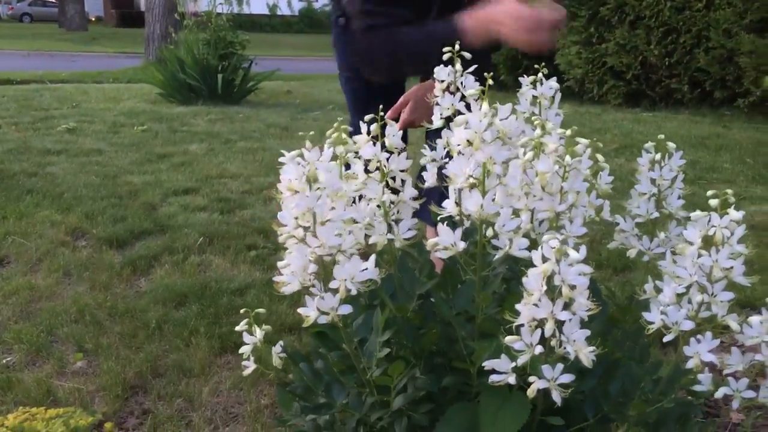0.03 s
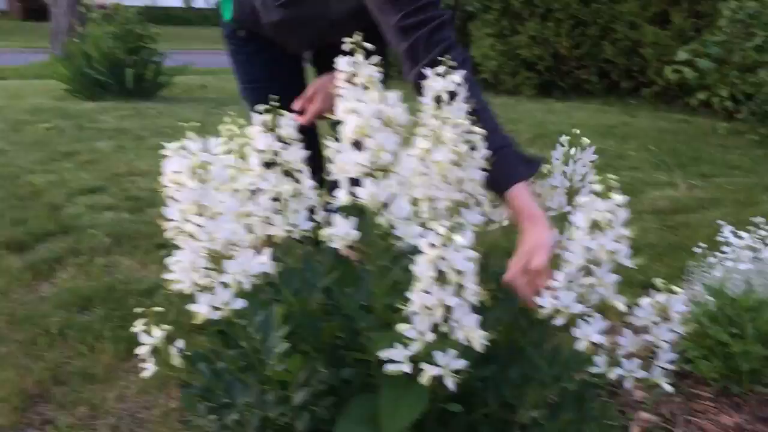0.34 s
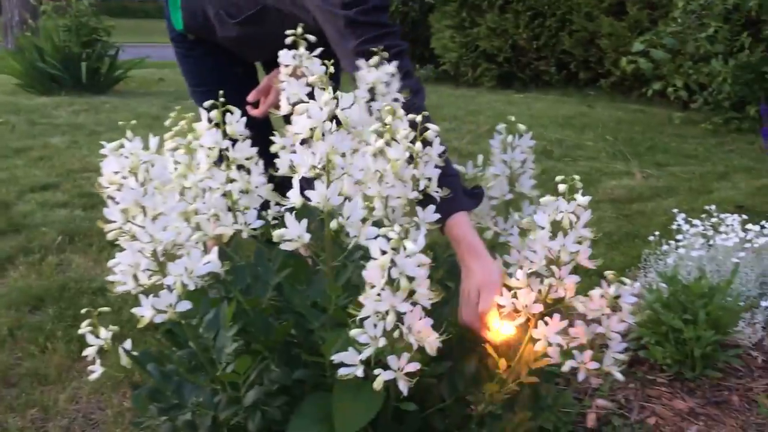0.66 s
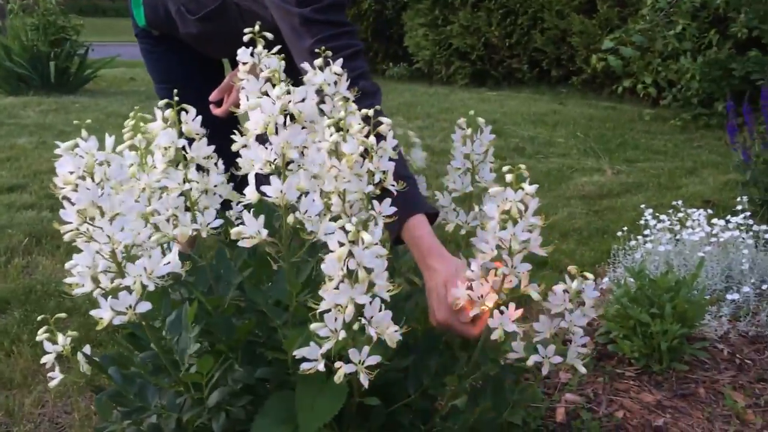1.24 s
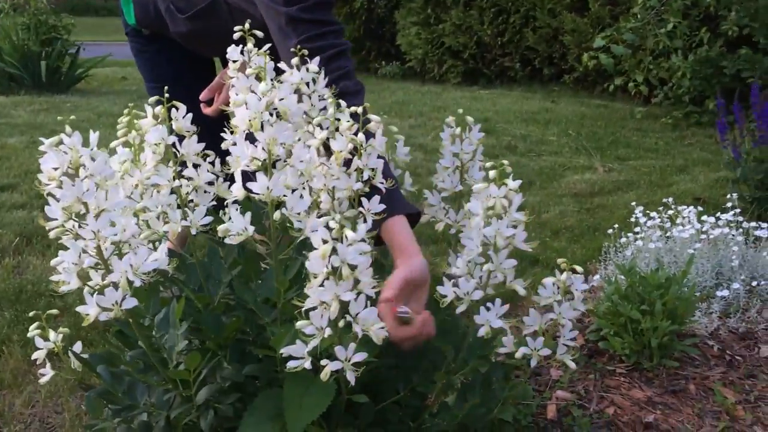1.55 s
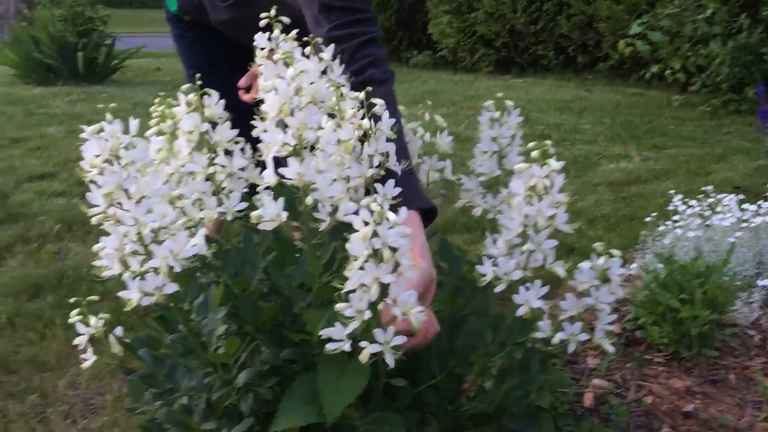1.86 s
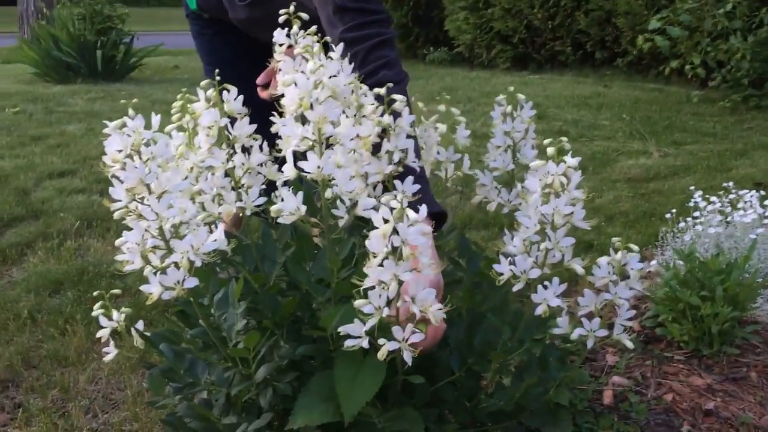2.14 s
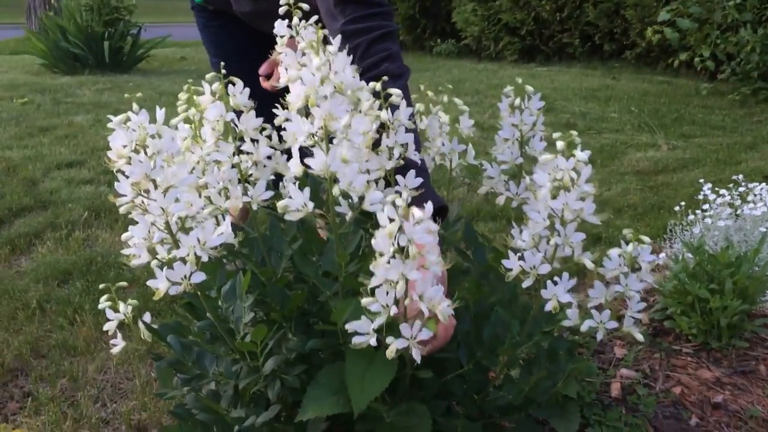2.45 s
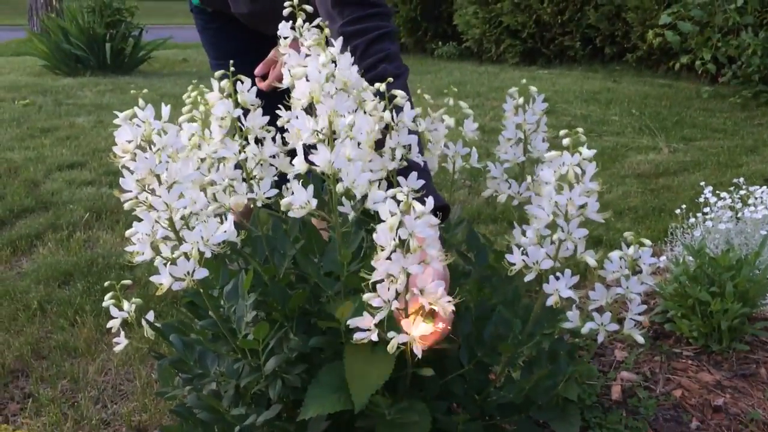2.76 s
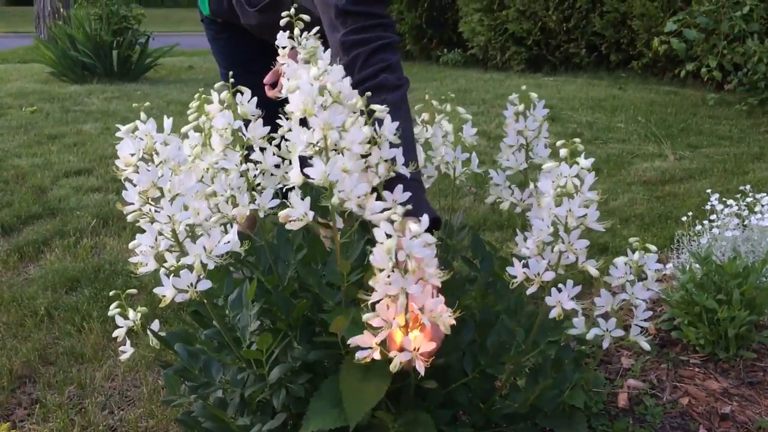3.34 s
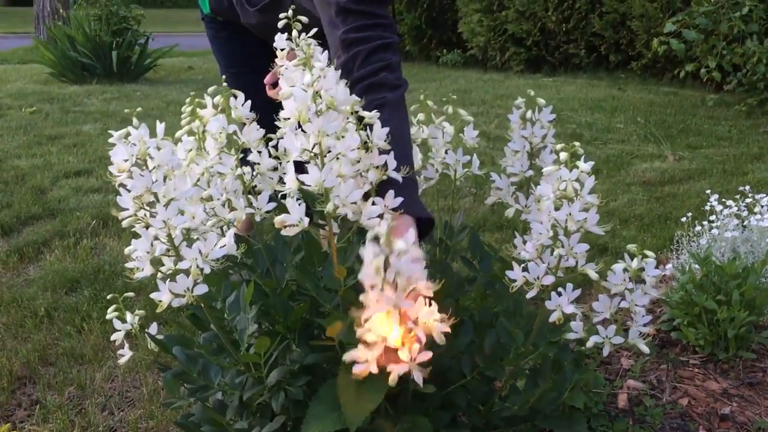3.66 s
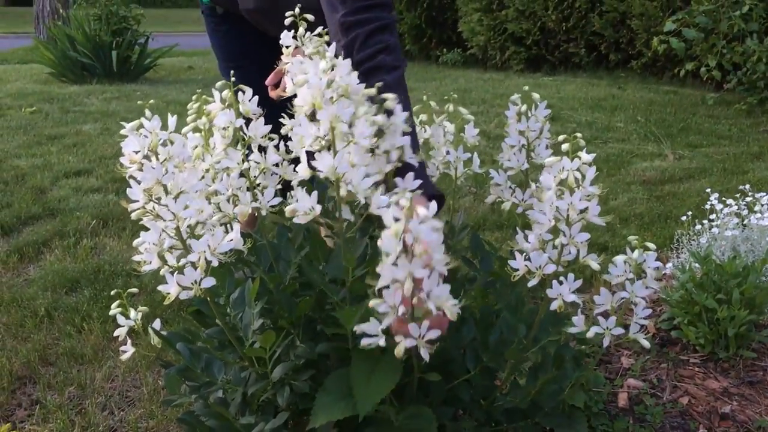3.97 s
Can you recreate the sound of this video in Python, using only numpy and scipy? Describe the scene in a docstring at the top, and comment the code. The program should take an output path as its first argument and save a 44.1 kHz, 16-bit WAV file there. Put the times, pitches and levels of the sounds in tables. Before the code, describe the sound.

A flint lighter rasps and snaps sharply close by at about 0.7, 2.2 and 2.8 seconds, the last strike the sharpest. Flame puffs softly from 0.9 to 1.3 seconds, and gas hisses faintly from 2.9 to 3.2. A bird trills quietly during the first second, while others whistle short phrases throughout. Leaves rustle slightly now and then over a low outdoor rumble and a distant engine drone.

```python
"""A lighter in a garden

A flint lighter is struck three times among the flowers: its wheel rasps and snaps, ringing the
hood and case. Gas hisses, the flame puffs and leaves brush a sleeve. One bird trills and others
whistle short phrases that echo in the trees, over a low rumble and the drone of a distant engine."""
import sys
import numpy as np
from scipy import signal
from scipy.fft import rfft, irfft
from scipy.io import wavfile

SR = 44100
rng = np.random.default_rng(int(sys.argv[2]) if len(sys.argv) > 2 else 0)


def generate_wav(signal):
    """Clip the signal to [-1, 1] and save it as 16-bit WAV at the path in sys.argv[1]."""
    frames = np.transpose(np.atleast_2d(signal))
    scaled = np.clip(frames, -1, 1) * 32767
    pcm = np.round(scaled).astype(np.int16)
    wavfile.write(sys.argv[1], SR, pcm)


N = 176400
T = np.arange(N) / SR

# tone of the distant rumble: (frequency [Hz], level [dB])
RUMBLE_SPECTRUM = [(45, -3.5), (70, 0), (85, 2.5), (105, -1), (122, -0.5), (140, -4.5), (165, -12),
                   (200, -14), (260, -18), (310, -25), (360, -31), (500, -48.5)]
# loudness of the rumble: (time [s], level [dB])
RUMBLE_LEVEL = [(0, -37), (.6, -41), (1.3, -42), (2.5, -42), (4, -44)]
# tone of the neighbourhood's hush: (frequency [Hz], level [dB])
HUSH_SPECTRUM = [(300, 6), (500, 2), (1000, 4), (1400, 1), (2200, -3.5), (3200, -12.5), (4800, -18.5),
                 (7000, -17.5), (10500, -23), (12500, -23), (15500, -26)]
# how fast the engine runs: (time [s], cycle rate [Hz])
ENGINE_RATE = [(0, 24.84), (1.4, 24.86), (1.9, 25.32), (2.5, 24.87), (3, 25.22), (4, 24.94)]
# the engine's two strongest tones, one list each: (time [s], level [dB])
DRONE_LEVELS = [
    [(0, -38.5), (.65, -36.5), (.82, -61), (.95, -33.5), (1.05, -31), (1.15, -46.5), (1.4, -34.5),
     (1.54, -48), (1.78, -34.5), (2.04, -36), (2.12, -56), (2.2, -34.5), (2.7, -40.5), (4, -39.5)],
    [(0, -39.5), (.5, -46), (1.1, -46.5), (1.3, -39), (1.55, -45.5), (2.1, -52), (4, -51.5)],
]
# its weaker tones: (multiple of the cycle rate, level at first [dB], level once turned away [dB])
WEAK_TONES = [(2, -74, -59), (3, -48, -60), (5, -54, -58), (7, -51.5, -65.5), (8, -59.5, -59.5),
              (9, -64, -63.5), (10, -62, -74), (11, -66, -77.5), (12, -57, -66), (18, -63.5, -76),
              (24, -66, -75.5)]
# faint hums: (start [s], length [s], pitch [Hz], level [dB])
HUMS = [(0.523, 0.33, 268.3, -55), (1.202, 0.35, 444, -68.5), (1.187, 0.38, 1345, -67.5),
        (2.924, .45, 445, -66.5), (2.93, 0.47, 1358, -66.5), (3.2, 0.14, 705, -62)]
# a far bird: (start [s], length [s], first pitch [Hz], middle pitch [Hz], last pitch [Hz], level [dB])
FAR_CHIRPS = [(1.665, .11, 3350, 3800, 3600, -72), (2.29, .04, 4150, 3880, 3650, -71),
              (2.46, .035, 4050, 3820, 3600, -73), (2.63, .04, 4150, 3820, 3550, -72)]
# whistled notes: (start [s], length [s], first pitch [Hz], middle pitch [Hz], last pitch [Hz],
# level [dB], roughness [0-1])
WHISTLED_NOTES = [(.583, 0.12, 3300, 3000, 3055, -63, 0.33), (.69, 0.061, 3070, 2810, 2620, -60, .6),
                  (.747, .044, 2090, 2174, 2110, -57.5, .1), (.806, 0.04, 2025, 2138, 2030, -61, .1),
                  (1.116, 0.021, 3630, 3070, 2870, -64.5, .2), (1.157, 0.04, 3025, 2585, 2140, -58, 0.54),
                  (1.187, 0.046, 2150, 2055, 2170, -58, 0.15), (1.255, 0.098, 2780, 2786, 2844, -63.5, .1),
                  (1.308, 0.053, 2560, 2480, 2490, -56, 0.31), (1.697, 0.092, 3060, 2920, 2670, -60, .5),
                  (1.769, .075, 2684, 2468, 2410, -50.5, 0.52), (1.837, 0.018, 3400, 2980, 2820, -64, 0.4),
                  (1.866, 0.044, 2266, 2704, 2840, -57.5, 0.9), (2.243, .053, 2790, 2937, 2870, -57, 0.15),
                  (2.305, 0.162, 2038, 2152, 2163, -53, .05), (2.772, 0.053, 2300, 2460, 2410, -54.5, 0.22),
                  (2.82, .054, 3190, 3350, 3200, -55.5, 0.24), (2.895, 0.056, 3274, 3195, 2140, -55, 0.3),
                  (3.382, 0.049, 2880, 3400, 3340, -54.5, 0.55),
                  (3.431, .031, 3120, 3184, 3060, -54.5, 0.58), (3.464, .036, 2720, 2620, 2720, -57.5, .3),
                  (3.493, .026, 2890, 2940, 2950, -63, 1)]
# one syllable of the trill flicks up and slides down: (delay [s], length [s], first pitch [Hz],
# middle pitch [Hz], last pitch [Hz], relative level [dB])
TRILL_SYLLABLE = [(.002, 0.008, 5570, 6480, 6950, 0), (0.01, .016, 6720, 5260, 4740, 4.5),
                  (.027, .042, 4800, 3850, 3100, -2)]
# volume of the whole trill: (time [s], gain [dB])
TRILL_GAIN = [(0, -60.5), (.3, -60), (.58, -61), (.76, -63.5), (.85, -62), (1.0, -64)]
# leaves brush the sleeve: (peak time [s], level [dB], rise [s], fall [s])
RUSTLES = [(.50, -66, 0.19, 0.1), (.925, -70, 0.034, .03), (1.11, -66, 0.015, 0.016),
           (1.21, -65.5, 0.052, 0.05), (1.49, -66.5, 0.012, .015), (1.55, -69, 0.038, .04),
           (1.88, -64, 0.034, 0.012), (2.04, -72, 0.036, 0.048), (2.31, -71, 0.14, 0.1),
           (3.10, -66, 0.025, 0.052), (3.49, -66.5, 0.12, 0.064), (3.95, -70, 0.013, .05)]
# tone of the leaves: (frequency [Hz], level [dB])
LEAF_SPECTRUM = [(1500, 6), (4000, 2), (7000, 10), (10000, 5), (13000, 6), (16000, -3.5)]
# gas flows while the lever is held: (start [s], end [s], level [dB])
GAS_FLOWS = [(2.856, 3.248, -63.5)]
# tone of the gas: (frequency [Hz], level [dB])
GAS_SPECTRUM = [(1000, 3), (3000, 2.5), (6500, -1), (10000, -5), (13000, -5), (16000, -7)]
# the flame puffs: (peak time [s], level [dB], rise [s], fall [s])
PUFFS = [(.899, -48.5, .005, .016), (.925, -52, .003, .007), (1.015, -55, .012, .035),
         (1.097, -53, .022, .025), (1.179, -45.5, .012, .028), (1.245, -58, .02, .025),
         (3.27, -64, .1, .036)]
# tone of the flame: (frequency [Hz], level [dB])
FLAME_SPECTRUM = [(150, -9.5), (380, 1.5), (470, -2.5), (590, -0.5), (760, -8.5), (1500, -7.5),
                  (2600, -13.5), (4000, -28.5), (6000, -24.5), (10000, -37), (16000, -32.5)]
# the thumb turns the wheel on the flint: (start [s], end [s], first level [dB], last level [dB])
WHEEL_SPINS = [(0.678, 0.6847, -46.5, -31.5), (2.124, 2.147, -47, -52), (2.151, 2.1567, -45, -38),
               (2.786, 2.837, -64.5, -48), (2.836, 2.8355, -44.5, -28)]
# snaps of flint and gas lever, and their small rebounds: (time [s], level [dB],
# time to fade by 60 dB [s], treble gain [dB], gain of the band that the grip damps [dB])
SNAPS = [(0.6862, -20.5, 0.021, 4, -5), (0.689, -30, 0.034, -15, -5), (0.714, -52, 0.12, -12, 6),
         (2.1575, -23, 0.025, -4, 5.5), (2.166, -36, 0.035, -12, -10), (2.1717, -29.5, .01, -2, -10),
         (2.1857, -34, 0.012, -6, -16), (2.8373, -12.5, 0.0066, 7, 1.5), (2.8400, -22.5, 0.016, -2, 0.5),
         (2.8455, -31.5, .022, -3, -1.5), (2.849, -35, 0.033, -8, -7.5), (2.8547, -39.5, 0.014, 3, -3),
         (2.508, -56, .025, 9.5, 0), (2.3810, -64.5, 0.026, 8, 0)]
# how the lighter's hood and case ring: (frequency [Hz], width [Hz], gain [dB])
CASE_RESONANCES = [(768, 770, -15), (1490, 530, -10), (2610, 320, -6.5), (3340, 260, -8.5),
                   (4510, 1100, -5.5), (6100, 720, -2), (7140, 450, -0.5), (8180, 530, -1.5),
                   (9360, 1100, -4.5), (11030, 310, -1.5), (12040, 620, -0.5), (13760, 840, -7.5)]


def from_db(db):
    """Turn decibels into a factor to multiply by."""
    return 10 ** (np.asarray(db) / 20)


def unit_power(x):
    """Scale a signal to an average power of 1."""
    return x / np.sqrt(np.mean(x ** 2) + 1e-20)


def curve(points):
    """Join (time, value) points with straight lines."""
    return np.interp(T, *np.transpose(points))


def drift(rate_hz):
    """A smooth random wobble, about 1 in size."""
    step = 40  # samples between random points
    pole = np.exp(-2 * np.pi * rate_hz * step / SR)
    noise = rng.standard_normal(N // step + 2002)
    slow = signal.lfilter([1], [1, -2 * pole, pole * pole], noise)[2000:]
    return np.interp(np.arange(N) / step, np.arange(len(slow)), unit_power(slow))


def grit(grain_db):
    """White noise made of grains of uneven size."""
    return unit_power(rng.standard_normal(N) * from_db(grain_db * drift(400)))


def colour(noise, spectrum):
    """Give noise the tone of a spectrum table, fading away beyond its ends."""
    hz, db = np.transpose(spectrum)
    freqs = np.arange(N // 2 + 1) * SR / N + 1e-3
    gain = from_db(np.interp(np.log(freqs), np.log(hz), db))
    roll_off = np.sqrt((1 + (freqs / hz[-1] / 1.2) ** 8) * (1 + (hz[0] / freqs / 1.3) ** 6))
    return unit_power(irfft(rfft(noise) * gain / roll_off, N))


def echoes(x, fade_s, build_s):
    """Blurred echoes from hedges and trees, dying by 60 dB in fade_s."""
    tail = rng.standard_normal(N) * from_db(-60 * T / fade_s) * (1 - np.exp(-T / build_s))
    return signal.fftconvolve(x, tail / np.linalg.norm(tail))[:N]


def swells(rows):
    """A loudness curve of soft rises and falls."""
    power = sum((from_db(db) * np.exp(np.minimum((T - peak) / rise, (peak - T) / fall))) ** 2
                for peak, db, rise, fall in rows)
    return np.sqrt(power + 1e-18)


def adjust_treble(x, gain_db):
    """Turn the highest sounds up or down."""
    treble = signal.lfilter(*signal.butter(1, 9220, "high", fs=SR), x + 1e-18)
    return x + (from_db(gain_db) - 1) * treble


def outdoors():
    """A low, distant rumble and the soft hush of the neighbourhood."""
    rumble = from_db(curve(RUMBLE_LEVEL)) * colour(rng.standard_normal(N), RUMBLE_SPECTRUM)
    hush = from_db(-59.5 + .5 * drift(1.4)) * colour(rng.standard_normal(N), HUSH_SPECTRUM)
    return rumble + hush


def engine(waver_db=3):
    """A far engine drones at multiples of its cycle rate; most weaker tones fade as it turns away."""
    phase = 2 * np.pi * np.cumsum(curve(ENGINE_RATE)) / SR
    drone = sum(from_db(curve(levels)) * np.sin(multiple * phase + rng.uniform(0, 2 * np.pi))
                for multiple, levels in zip((4, 6), DRONE_LEVELS))
    for multiple, early_db, late_db in WEAK_TONES:
        turn_s = (.28, .68) if multiple >= 12 else (1.1, 1.66)  # the high tones weaken first
        level = from_db(np.interp(T, turn_s, [early_db, late_db]) + waver_db * drift(5.9))
        drone += level * np.sin(multiple * phase + rng.uniform(0, 2 * np.pi) + .25 * drift(3))
    return drone


def far_hums(waver=.03):
    """Faint wavering tones that swell and die away."""
    hums = np.zeros(N)
    for start, length, hz, db in HUMS:
        progress = np.clip((T - start) / length, 0, 1)
        arch = np.sqrt(2 * np.abs(np.sin(np.pi * progress)))
        pitch = hz * (1 + waver * drift(38))
        hums += from_db(db) * arch * np.sin(2 * np.pi * np.cumsum(pitch) / SR)
    return hums


def bird_notes(notes, fade_db, edge_s=.0055, pitch_shake=.045, flutter_db=5):
    """Each note is a pure tone gliding through three pitches; roughness shakes its pitch and level."""
    song, waver, flutter = np.zeros(N), drift(200), drift(120)
    for start, length, first, middle, last, db, roughness in notes:
        on = (T >= start) & (T < start + length)
        age = T[on] - start
        u = age / length  # 0 to 1 through the note
        glide = first * (1 - u) * (1 - 2 * u) + middle * 4 * u * (1 - u) + last * u * (2 * u - 1)
        pitch = glide * (1 + pitch_shake * roughness * waver[on])
        edges = np.clip(np.minimum(age, length - age) / edge_s, 0, 1)
        arch = np.sin(np.pi * np.clip(u, 0, 1)) ** .35
        tremble = unit_power(from_db(flutter_db * roughness * flutter[on]))
        level = from_db(db - fade_db * (u - .5)) * tremble * edges * arch
        song[on] += np.sqrt(2) * level * np.sin(2 * np.pi * np.cumsum(pitch) / SR)
    return song


def distant_bird(roughness=.3):
    """Faint chirps from far away, heard mostly by their echo."""
    song = bird_notes([(*chirp, roughness) for chirp in FAR_CHIRPS], fade_db=1)
    return .7 * song + echoes(song, fade_s=.35, build_s=.004)


def whistling_birds():
    """Short sliding phrases, smeared by nearby leaves, with a faint echo from the trees."""
    song = bird_notes(WHISTLED_NOTES, fade_db=-4)  # each note grows louder
    foliage = from_db(-8) * echoes(song, fade_s=.052, build_s=.0046)
    trees = from_db(-11) * echoes(song, fade_s=.9, build_s=.0057)
    return song + foliage + trees


def trilling_bird(period_s=.0995, roughness=.6, hedge_delay_s=.034):
    """Ten buzzy falling syllables a second, thrown back by a hedge and blurred by the trees."""
    notes = [(.022 + k * period_s + delay, *shape, roughness)
             for k in range(10) for delay, *shape in TRILL_SYLLABLE]
    song = bird_notes(notes, fade_db=6.5, edge_s=.00093)
    hedge = np.interp(T - hedge_delay_s, T, echoes(song, fade_s=.16, build_s=.0022))
    near = song + echoes(song, fade_s=.04, build_s=.0012)
    trees = echoes(song, fade_s=.45, build_s=.0073)
    trill = from_db(-4) * near + from_db(1) * (hedge + trees)
    skip = int(2 * period_s * SR)  # the trill is already under way at the start
    return np.pad(trill[skip:], (0, skip)) * from_db(curve(TRILL_GAIN))


def leaves(ticks_per_s=45, tick_s=.0012):
    """Leaves brush a sleeve in faint grainy rustles, with small ticks of stems and petals."""
    ticks = (rng.random(N) < ticks_per_s / SR) * from_db(3 * np.minimum(rng.exponential(1, N), 3))
    fading_ticks = signal.lfilter([1], [1, -np.exp(-1 / (tick_s * SR))], ticks + 1e-18)
    crackle = from_db(-3) * unit_power(fading_ticks * rng.standard_normal(N))
    return swells(RUSTLES) * colour(grit(grain_db=.5) + crackle, LEAF_SPECTRUM)


def gas(valve_s=.006):
    """A steady jet of gas hisses until the lever is let go."""
    flow = sum(from_db(db) * np.clip(np.minimum(T - start, end - T) / valve_s, 0, 1)
               for start, end, db in GAS_FLOWS)
    return flow * colour(grit(grain_db=3), GAS_SPECTRUM)


def flame():
    """The gas burns in soft, low puffs."""
    return swells(PUFFS) * colour(grit(grain_db=5.5), FLAME_SPECTRUM)


def wheel_rasp(rise_s=.06, release_s=.00205):
    """The wheel scrapes the flint: gritty noise that builds up and stops sharply."""
    level = np.zeros(N)
    for start, end, first_db, last_db in WHEEL_SPINS:
        fade = np.clip(np.maximum((start - T) / rise_s, (T - end) / release_s), 0, 2)
        level += from_db(np.interp(T, [start, end], [first_db, last_db]) - 60 * fade)
    return adjust_treble(level * grit(grain_db=2.5), gain_db=-3.5)


def snaps(rise_s=.00022, grip_band_hz=(7400, 10800)):
    """Flint and lever snap in tiny bursts of noise; the hand's grip shapes one high band."""
    grip_filter = signal.butter(1, grip_band_hz, "band", fs=SR)
    force = np.zeros(N)
    for start, db, fade_s, treble_db, grip_db in SNAPS:
        age = np.clip(T - start, 0, 5 * fade_s)
        level = np.minimum(age / rise_s, 1) * from_db(db - 60 * age / fade_s)
        burst = level * rng.choice([-1, 1], N)
        grip_band = signal.lfilter(*grip_filter, burst + 1e-18)
        force += adjust_treble(burst + (from_db(grip_db) - 1) * grip_band, treble_db)
    return force


def lighter():
    """The rasps and snaps make the hood and case ring, with a faint echo."""
    force = wheel_rasp() + snaps()
    ring = np.zeros(N)
    for k, (hz, width, db) in enumerate(CASE_RESONANCES):
        pole = np.exp(-np.pi * width / SR)  # a wider resonance dies sooner
        feedback = [1, -2 * pole * np.cos(2 * np.pi * hz / SR), pole * pole]
        gain = (-1) ** k * from_db(db) * (1 - pole * pole)
        ring += gain * signal.lfilter([1, 0, -1], feedback, force)
    return ring + from_db(-21) * echoes(ring, fade_s=.22, build_s=.0089)


def scene():
    """All the sounds meet at one microphone."""
    background = outdoors() + engine() + far_hums()
    birds = distant_bird() + whistling_birds() + trilling_bird()
    return (background + birds + leaves() + gas() + flame() + lighter())[None]


def record(dry, bass_cut_hz=45, top_cut_hz=16100):
    """Cut the deepest bass and the highest treble steeply."""
    x = signal.sosfilt(signal.butter(6, bass_cut_hz, "high", fs=SR, output="sos"), dry)
    return signal.sosfilt(signal.ellip(10, .1, 80, top_cut_hz, fs=SR, output="sos"), x)


dry = scene()
out = record(dry)
generate_wav(out)
```